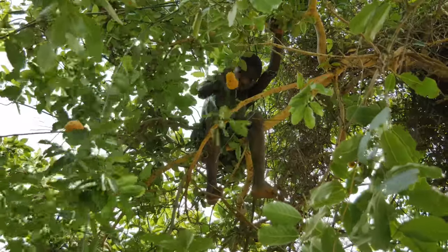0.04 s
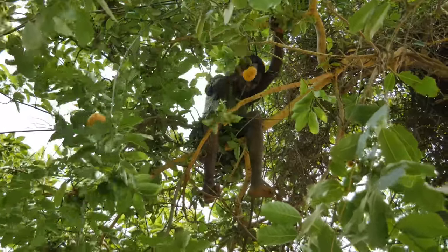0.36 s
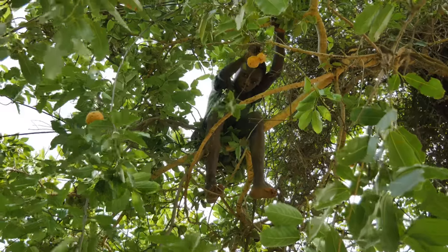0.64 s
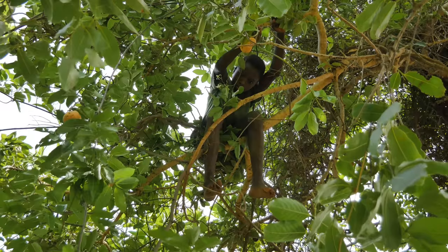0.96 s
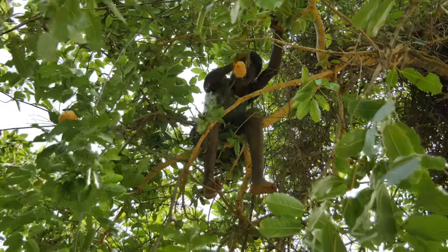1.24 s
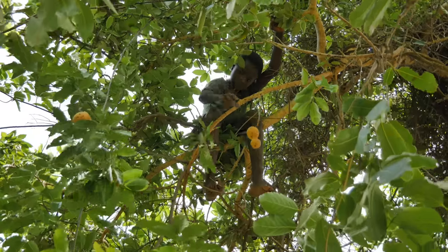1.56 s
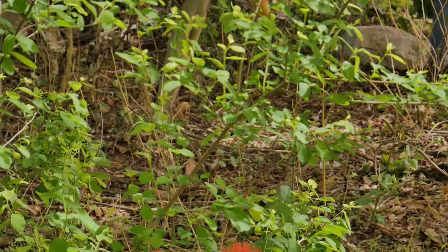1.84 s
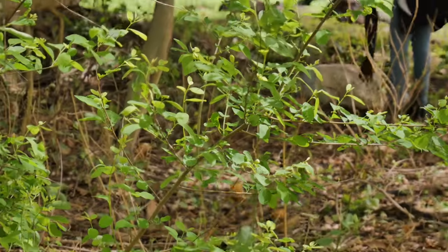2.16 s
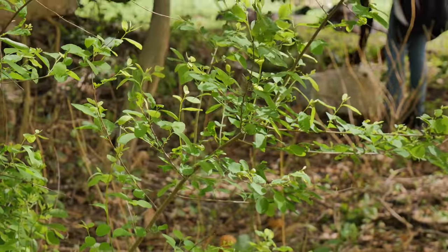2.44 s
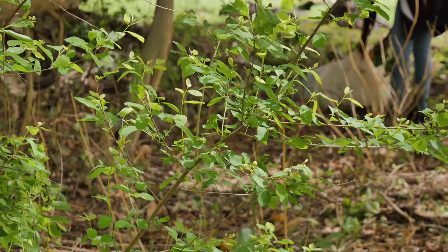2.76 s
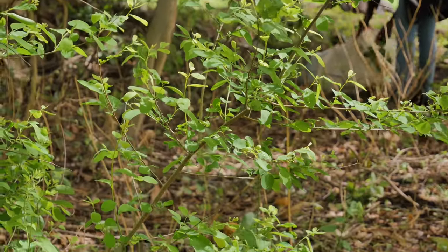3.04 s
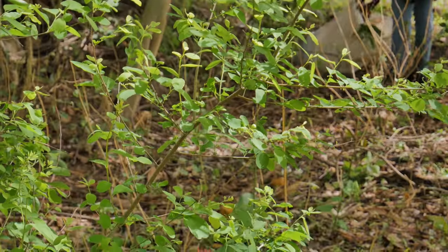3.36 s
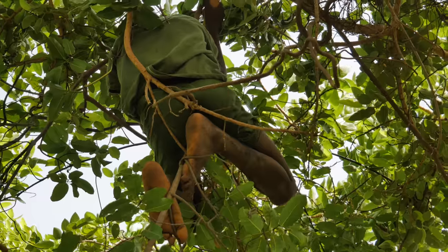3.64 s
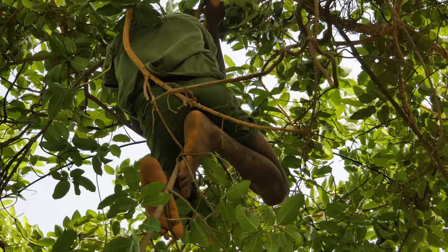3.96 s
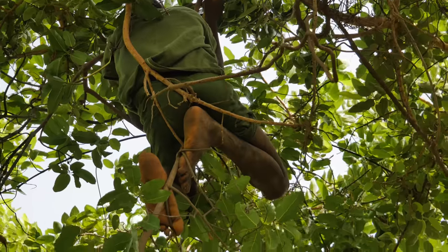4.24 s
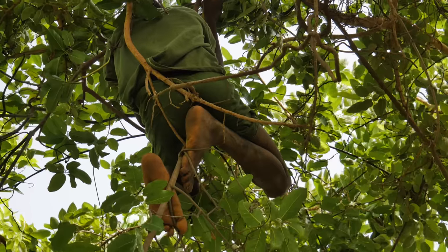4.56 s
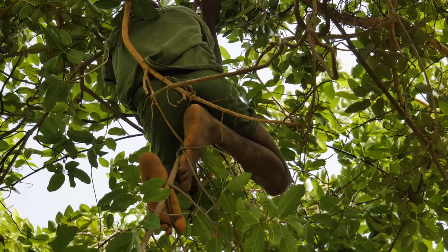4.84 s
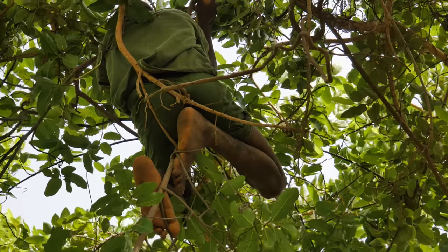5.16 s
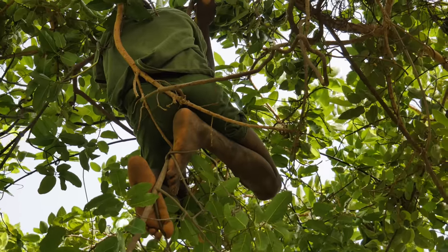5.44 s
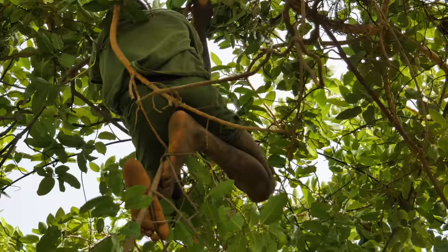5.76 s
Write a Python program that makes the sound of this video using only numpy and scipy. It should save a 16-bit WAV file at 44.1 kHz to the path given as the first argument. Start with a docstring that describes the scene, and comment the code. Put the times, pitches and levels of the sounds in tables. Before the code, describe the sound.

Someone picking fruit high in a tree pulls at branches, so leaves rustle in uneven bursts and twigs snap. About two seconds in, a fruit drops through the foliage, crashes into dry litter and bounces. More rustling and snapping follow, then a soft, dull knock on a thick branch. One microphone under the tree also picks up faint, far bird whistles and a low rumble in the still air.

```python
"""Under a leafy tree in still air, one microphone, with someone picking fruit high overhead.
Pulled branches set the leaves rubbing and twigs snapping. A fruit drops through the foliage,
crashes into dry litter with a faint sinking tone, and bounces; later a thick branch takes a dull knock.
Small birds whistle far off, scattered by the trees. Low rumble swells now and then."""
import sys
import numpy as np
from scipy import signal
from scipy.fft import rfft, irfft
from scipy.io import wavfile

SR = 44100
rng = np.random.default_rng(int(sys.argv[2]) if len(sys.argv) > 2 else 0)


def log_audio(samples):
    """Write samples as a 16-bit WAV file to the path given in sys.argv[1]."""
    # one column per channel
    frames = np.atleast_2d(samples).T
    # limit to full scale, then quantise
    limited = np.clip(frames, -1, 1)
    pcm = np.round(limited * 32767).astype(np.int16)
    wavfile.write(sys.argv[1], SR, pcm)


N = 264159

# Branches pulled and let go: t/s, leaf level/dB, rise/s, hold/s, settling t60/s,
# edge hiss/dB and stem scrape/dB (both relative to the leaves)
PULLS = [(0.0, -45, 0.0011, 0.097, 1.3, -2.5, -8), (0.386, -47.5, 0.023, .04, .3, -9, -4),
         (0.526, -47.5, .008, .035, 0.18, -3, -4.5), (0.586, -56, .02, 0.11, .3, 1.5, -17),
         (0.699, -46, .04, 0.1, 0.43, 3, -16), (0.925, -51.5, 0.017, 0.057, 0.57, 0, -11),
         (1.107, -49, .03, .04, 0.35, 3, -16), (1.196, -47, .02, 0.047, 0.73, 0, -10.5),
         (1.357, -56, 0.015, 0.092, 0.36, 0, -16), (1.494, -51.5, .03, 0.22, .4, -3.5, -12),
         (1.671, -41.5, 0.028, 0.18, 0.083, -8, -8), (2.155, -44, .05, .008, 0.38, -9, -8),
         (2.407, -51, .02, .06, 1.8, -6, -7.5), (2.8, -56.5, 0.018, 0.13, .3, -6, -8),
         (3.017, -54, 0.096, 0.16, .4, -12, -6), (3.37, -55, 0.018, 0.16, 1.3, -8, -6.5),
         (3.618, -52.5, 0.12, 0.21, .3, -2, -12.5), (3.936, -50.5, 0.036, 0.047, .3, -2, -9),
         (4.005, -34.5, .1, 0.052, .7, -3, -8.5), (4.197, -45.5, 0.074, 0.19, 0.93, -6.5, -7.5),
         (4.825, -52.5, .01, 0.042, 1.7, -3, -5), (5.283, -49, .007, .02, 0.33, -3, -9),
         (5.339, -51, 0.052, 0.098, 0.96, 3.5, -9), (5.55, -54, .04, .05, .25, -3, -7),
         (5.722, -51.5, .04, 0.17, 0.55, -10, -6.5)]
REST_DB = -60   # leaves stirring between pulls


def from_db(db):
    """Decibels to gain."""
    return 10 ** (np.asarray(db) / 20)


def rms_one(x):
    """Scale to unit power."""
    return x / np.sqrt(np.mean(x ** 2) + 1e-20)


def add(out, s, sound):
    """Mix a sound in at s seconds."""
    i = max(round(s * SR), 0)
    out[i:i + len(sound)] += sound[:N - i]


def coloured(x, spectrum, tilt_db=0):
    """Give a flat signal a spectrum, tilted per octave above 1500 Hz; rms 1."""
    hz = np.maximum(np.fft.rfftfreq(len(x), 1 / SR), 1)
    points = np.array(spectrum)
    db = np.interp(np.log(hz), np.log(points[:, 0]), points[:, 1])
    db += tilt_db * np.log2(np.maximum(hz, 1500))
    return rms_one(irfft(rfft(x) * from_db(db), len(x)))


def band(x, low_hz, high_hz):
    """Butterworth band-pass."""
    sos = signal.butter(2, [low_hz, min(high_hz, .45 * SR)], "band", fs=SR, output="sos")
    return signal.sosfilt(sos, x)


def between(x, low_hz, high_hz, order=6):
    """One soft-edged band of a noise."""
    hz = np.fft.rfftfreq(len(x), 1 / SR)
    gain = 1 / (1 + (hz / high_hz) ** order) - 1 / (1 + (hz / low_hz) ** order)
    return irfft(rfft(x) * gain, len(x))


def resonate(x, hz, width_hz):
    """One resonance with gain 1 at its peak."""
    r = np.exp(-np.pi * width_hz / SR)
    feedback = [1, -2 * r * np.cos(2 * np.pi * hz / SR), r * r]
    return signal.lfilter(np.array([1, 0, -1]) * (1 - r * r) / 2, feedback, x + 1e-18)


def drift(per_s):
    """A random wander through per_s points a second; rms 1."""
    knots = rng.standard_normal(4096)
    return rms_one(np.interp(np.arange(N) / SR * per_s, np.arange(len(knots)), knots))


def swell(s, db, rise, hold, t60):
    """A gain that rises at s seconds, holds and dies away."""
    t = np.arange(N) / SR - s
    return np.clip(t / rise, 0, 1) * from_db(db - 60 * np.maximum(t - rise - hold, 0) / t60)


def strike(t, db, rise, t60):
    """The gain of a blow: it rises and at once dies away."""
    return np.minimum(t / rise, 1) * from_db(db - 60 * np.maximum(t - rise, 0) / t60)


def crackle(per_s, spread_db, quality, hiss_db):
    """Countless leaf contacts, each a tick with its own pitch, over the blur of farther ones."""
    contacts = rng.random(N) < per_s / SR
    strength = from_db(spread_db * np.minimum(rng.exponential(1, N), 4))
    clicks = contacts * strength * rng.choice([-1, 1], N)
    pitches = np.geomspace(700, 15000, num=16)
    dealt = rng.integers(0, len(pitches), N)
    ticks = sum(resonate(clicks * (dealt == k), hz, hz / quality) for k, hz in enumerate(pitches))
    return rms_one(rms_one(ticks) + from_db(hiss_db) * rng.standard_normal(N))


def foliage(flutter_db=1.16, rest_hiss_db=-5, rest_stem_db=-7):
    """Each pull sets leaves rubbing overhead: stems scrape coarsely, blades crackle, edges hiss."""
    # Spectrum of rubbing leaves, with the microphone's treble colour: f/Hz, relative level/dB
    leaf_spectrum = [(300, 7), (700, 0), (1400, -1), (2500, 3), (3700, -1.5), (6000, 0.5), (8200, 2.5),
                     (9800, -1), (11500, -4.5), (15500, -2.5)]
    power = from_db(REST_DB + np.array([[rest_stem_db], [0], [rest_hiss_db]])) ** 2
    for s, db, rise, hold, t60, edge_db, stem_db in PULLS:
        power = power + np.outer(from_db([stem_db, 0, edge_db]), swell(s, db, rise, hold, t60)) ** 2
    leaves = coloured(crackle(per_s=2800, spread_db=3.5, quality=2.9, hiss_db=5.5), leaf_spectrum)
    scrapes = coloured(crackle(per_s=1200, spread_db=4.0, quality=1.7, hiss_db=2.0), leaf_spectrum)
    stems = rms_one(between(scrapes, 350, 2710))
    blades = rms_one(between(leaves, 2580, 8420))
    edges = rms_one(between(leaves, 10440, 19100))
    flutter = from_db(flutter_db * drift(per_s=120))
    return flutter * np.sum(np.sqrt(power) * [stems, blades, edges], axis=0)


def ambience(steady_db=-49):
    """Far rumble and the faint hiss of the wood; low rumble swells now and then."""
    # Spectrum of the still wood, with the microphone's treble colour: f/Hz, relative level/dB
    wood_spectrum = [(12, -29), (25, -2), (80, -4), (150, -4.5), (210, -5.5), (450, -12), (900, -20),
                     (1500, -22.5), (2700, -20), (4500, -19.5), (8200, -20.5), (11000, -27.5), (15500, -22)]
    # Swells of low rumble: t/s, level/dB, rise/s, hold/s, t60/s
    rumbles = [(1.9, -53.5, 0.07, .8, 2.2), (5.07, -52, .04, .03, .5), (5.3, -66, 0.084, 0.44, 1.5)]
    steady = from_db(steady_db) * coloured(rng.standard_normal(N), wood_spectrum)
    low_rumble = rms_one(band(rng.standard_normal(N), 23, 107))
    return steady + sum(swell(*rumble) for rumble in rumbles) * low_rumble


def leaf_swishes():
    """A struck spray flares up, then its leaves settle."""
    # Sprays brushed or struck: t/s, level/dB, rise/s, t60/s, treble tilt/(dB per octave)
    sprays = [(.077, -34.5, 0.0018, 0.32, 6.5), (.213, -33.5, 0.011, 0.32, 11.5),
              (.35, -40, 0.011, 0.33, 6.5), (0.493, -41, .004, .18, 9), (0.851, -28.5, 0.0018, 0.054, -1.5),
              (.942, -33, 0.0017, 0.032, -2), (1.182, -31.5, 0.0022, 0.17, 4),
              (1.732, -30, 0.028, 0.09, -0.5), (1.766, -22.5, 0.0055, 0.016, 0.5),
              (1.836, -41, .008, .09, -3), (1.944, -23, .001, 0.26, 2.5), (1.9475, -15, 0.0015, 0.034, -1),
              (2.021, -33, .002, 0.1, 4), (2.033, -19, 0.0014, 0.072, -2), (2.047, -25, 0.0035, 0.23, 1),
              (2.13, -34.5, 0.0045, 0.13, -0.5), (2.375, -31.5, 0.007, 0.2, -2.5),
              (4.405, -37.5, 0.022, .1, 14), (4.458, -29, .003, 0.033, 10), (4.83, -44, 0.0014, 0.088, -3),
              (5.399, -40.5, 0.0022, 0.055, -1.5)]
    # Spectrum of struck leaves, with the microphone's treble colour: f/Hz, relative level/dB
    struck_spectrum = [(90, -31), (200, -7.5), (700, -10), (980, -12.5), (1250, -9), (1800, -12),
                       (2650, -3), (3800, -5.5), (5200, -0.5), (7000, -3), (8200, -2.5), (10500, -11),
                       (15500, -12.5)]
    out, t = np.zeros(N), np.arange(SR // 3) / SR
    grains = crackle(per_s=5000, spread_db=3.5, quality=2.7, hiss_db=3.5)
    for s, db, rise, t60, tilt_db in sprays:
        stretch = np.roll(grains, -round(SR * rng.uniform(0, 5)))[:len(t)]
        add(out, s, coloured(stretch, struck_spectrum, tilt_db) * strike(t, db, rise, t60))
    return out


def twig_snaps(splinter_t60=0.024, quality=7.4):
    """Fibres part with one sharp crack and splinter briefly; the twig rings at its own pitch."""
    # Twigs snapping and tapping: t/s, peak level/dB, f/Hz, relative splintering/dB, relative ring/dB
    snaps = [(.078, -20, 7900, -9, 8), (0.1096, -27.5, 1690, -15, 2), (.407, -27, 6570, -12, -6),
             (.435, -36, 2300, 2, 1), (0.467, -27, 5700, -5, 0), (.533, -35, 2520, -5, 12),
             (0.569, -27.5, 5620, -5, 11), (0.618, -26.5, 7600, -11, 16), (0.8107, -17, 6000, -4.5, 17),
             (0.8284, -24, 5400, -9, 18), (0.8503, -12, 5400, -10, 5), (.897, -22, 6160, 1, -4),
             (0.929, -35, 2180, -5, 15), (0.942, -26, 5500, -12, 1), (.9595, -27, 4000, -17, -12),
             (1.105, -26, 4150, -4, -12), (1.167, -27, 5200, -4, 2), (1.1833, -19.5, 8400, -5, -16),
             (1.7705, -22, 5870, -15, -5), (1.949, -14, 7900, -2, 5), (2.0214, -17, 5000, -6, -15),
             (2.0344, -17.5, 2770, 1, 5), (2.038, -17, 4240, -19, 0), (2.055, -16.5, 3070, -4, 0),
             (2.305, -33, 5570, -3, -8), (2.3735, -13, 4730, -31, -15), (2.563, -26.5, 2380, -13, 5),
             (2.57, -23, 2700, -12, 2), (2.812, -24.5, 5140, -6, 8), (3.274, -35.5, 2050, -8, 6),
             (3.7707, -28, 6000, -5, 4), (3.865, -22, 2900, -26, 7), (3.868, -21.5, 2130, -21, 2),
             (4.051, -16.5, 5040, -14, 0), (4.111, -15, 5300, -21, -11), (4.182, -17.5, 4400, -10, -17),
             (4.4607, -28, 8100, -14, -2), (4.717, -30, 2840, -13, -6), (4.831, -31, 3180, -6, -11),
             (4.966, -25.5, 4000, -9, -4), (5.289, -29, 7700, -7, 2), (5.625, -32, 3060, -10, -12)]
    out, t = np.zeros(N), np.arange(SR // 10) / SR
    for s, db, hz, splinter_db, ring_db in snaps:
        fibres = rng.standard_normal(len(t)) * from_db(splinter_db - 11.5 - 60 * t / splinter_t60)
        fibres[0] = 1   # the break itself
        crack = band(fibres, hz / 4.44, hz * 1.65)
        ring = resonate(fibres, hz, hz / quality) * np.sqrt(quality)
        snap = crack + from_db(ring_db) * ring
        add(out, s, from_db(db) * snap / np.abs(snap).max())
    return out


def twig_flicks(per_s=12, boost_db=5, spread_db=5, t60=.02, effort_cap_db=-47, low_hz=2500, high_hz=8800):
    """Tiny twigs flick against leaves at random, harder while a branch is pulled."""
    out, t = np.zeros(N), np.arange(SR // 20) / SR
    effort = np.sqrt(from_db(REST_DB) ** 2 + sum(swell(*pull[:5]) ** 2 for pull in PULLS))
    effort = np.minimum(effort, from_db(effort_cap_db))
    chance, size, pitch = rng.random((3, N))
    grain = rng.standard_normal(N + len(t))
    for i in np.flatnonzero(chance < per_s / SR):
        hz = low_hz * (high_hz / low_hz) ** pitch[i]
        flick = rms_one(band(grain[i:i + len(t)], hz / 2, hz * 1.63)) * from_db(-60 * t / t60)
        add(out, i / SR, flick * effort[i] * from_db(boost_db + spread_db * size[i]))
    return out


def thuds(contact_s=0.0048, puff_db=-9.5):
    """A soft contact pushes a heavily damped mode, with a puff of dull noise."""
    # Blunt blows on wood, litter and soil: t/s, level/dB, f/Hz, t60/s
    blows = [(.85, -43, 700, .03), (1.947, -31, 550, 0.023), (1.958, -23, 90, 0.051),
             (2.033, -32.5, 1172, 0.023), (2.042, -25, 99, 0.067), (2.05, -31, 730, 0.014)]
    out, t = np.zeros(N), np.arange(SR // 4) / SR
    for s, db, hz, t60 in blows:
        puff = rms_one(band(rng.standard_normal(len(t)), hz * 1.55, hz * 2.55))
        swing = from_db(puff_db) * puff - np.sin(2 * np.pi * hz * t)
        add(out, s, swing * strike(t, db, contact_s, t60))
    return out


def birds(burr_depth=0.021):
    """Thin whistles hold their pitch, fall with a slight burr and level out."""
    # Falling chirps: t/s, length/s, start f/Hz, end f/Hz, level/dB before the trees scatter them
    chirps = [(1.523, 0.034, 3450, 2530, -48), (2.773, 0.1, 2790, 2630, -58),
              (3.205, 0.045, 2850, 2010, -53), (3.391, 0.035, 2940, 2150, -48),
              (3.588, 0.026, 2900, 2240, -52), (4.895, .09, 4350, 2895, -41.5),
              (5.561, 0.093, 3390, 2680, -51.5), (5.822, 0.08, 2950, 2800, -56.5)]
    out, wobble = np.zeros(N), drift(per_s=450)
    for s, length, start_hz, end_hz, db in chirps:
        u = np.linspace(0, 1, int(length * SR))
        hz = start_hz + (end_hz - start_hz) * np.sin(np.pi * u / 2) ** 2
        burr = 1 + burr_depth * np.sin(np.pi * u) * np.roll(wobble, -int(s * SR))[:len(u)]
        breath = 2.65 * np.sqrt(u) * (1 - u)   # peaks near 1
        add(out, s, from_db(db) * breath * np.sin(2 * np.pi * np.cumsum(hz * burr) / SR))
    return out


def sinking_tone(at_s=1.965, length_s=.12, fade_s=.011, start_hz=716, end_hz=566, db=-49, growth_db=10):
    """As the fruit lands, a faint tone sinks and levels out, growing louder as it goes."""
    out, u = np.zeros(N), np.linspace(0, 1, int(length_s * SR))
    hz = end_hz + (start_hz - end_hz) * (1 - u) ** 2
    fade = np.minimum(np.minimum(u, 1 - u) * length_s / fade_s, 1)
    add(out, at_s, fade * from_db(db + growth_db * u) * np.sin(2 * np.pi * np.cumsum(hz) / SR))
    return out


def branch_knock(at_s=4.969, db=-46, contact_s=.014):
    """A soft, rough contact sets a thick branch's low modes ringing."""
    # Modes of the branch: f/Hz, relative level/dB, t60/s
    modes = [(268, -4, .16), (365, -1, 0.15), (435, 0, 0.11), (560, -5, .07), (670, -5, .08),
             (820, -7, .07)]
    out, t = np.zeros(N), np.arange(SR // 4) / SR
    for hz, mode_db, t60 in modes:
        ring = rms_one(resonate(rng.standard_normal(len(t)), hz, width_hz=40))
        add(out, at_s, ring * strike(t, db + mode_db, contact_s, t60))
    return out


def grove(x, t60):
    """Trunks and crowns scatter a thin tail of echoes."""
    t = np.arange(SR // 2) / SR
    echoes = rng.standard_normal(len(t)) * (rng.random(len(t)) < .05) * from_db(-60 * t / t60)
    return signal.fftconvolve(x, echoes / np.linalg.norm(echoes))[:N]


def scene():
    """One microphone feeds both channels: the tree is near, the far birds arrive mostly as echoes."""
    blows = leaf_swishes() + twig_snaps() + twig_flicks() + thuds() + branch_knock()
    song = birds()
    near = foliage() + blows + from_db(-11.5) * grove(blows, t60=0.23)
    far = from_db(-6.5) * song + from_db(-1.0) * (grove(song, t60=0.1) + grove(song, t60=0.67))
    return np.tile(near + far + sinking_tone() + ambience(), (2, 1))


def record(dry, cutoff_hz=15900):
    """A steep low-pass takes off the highest treble."""
    return signal.sosfilt(signal.ellip(12, .1, 80, cutoff_hz, fs=SR, output="sos"), dry)


dry = scene()
out = record(dry)
log_audio(out)
```